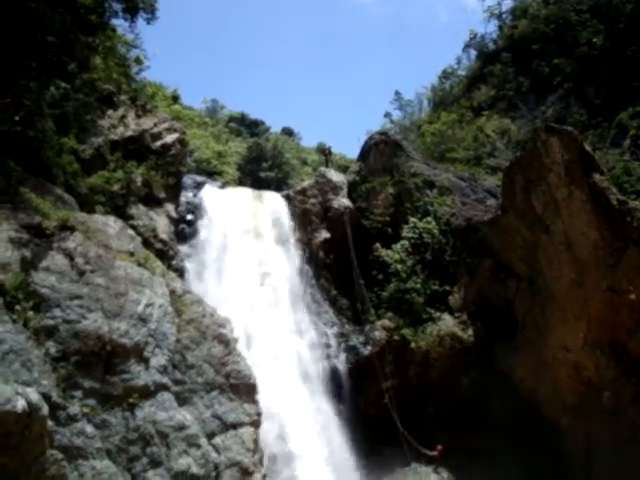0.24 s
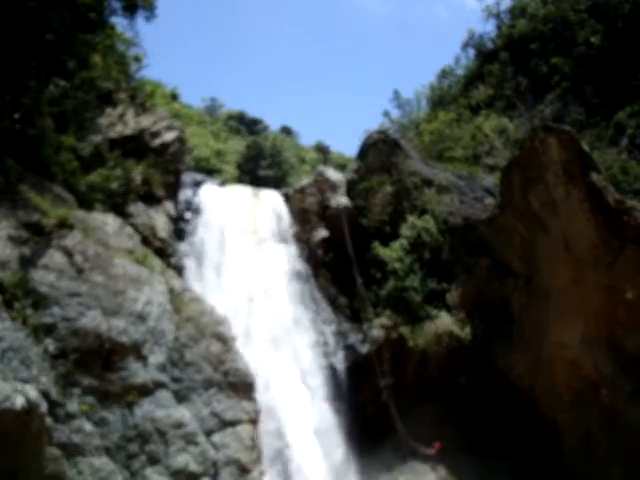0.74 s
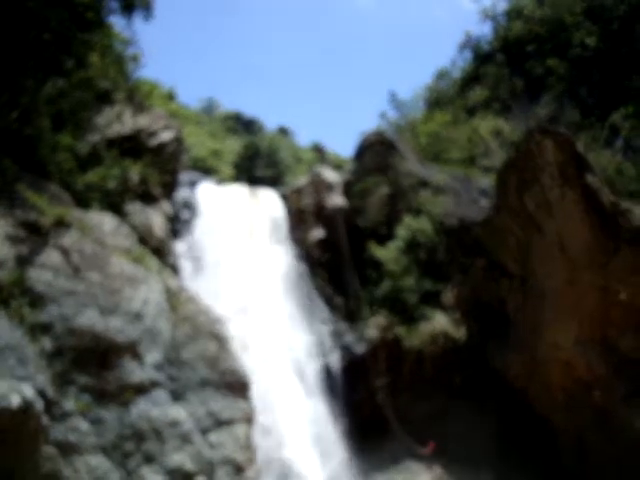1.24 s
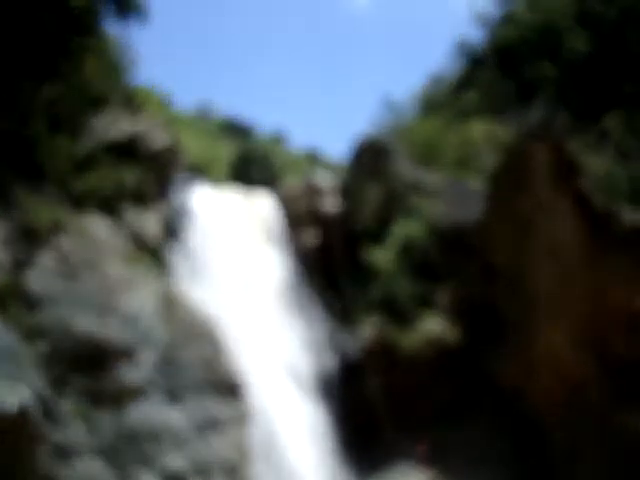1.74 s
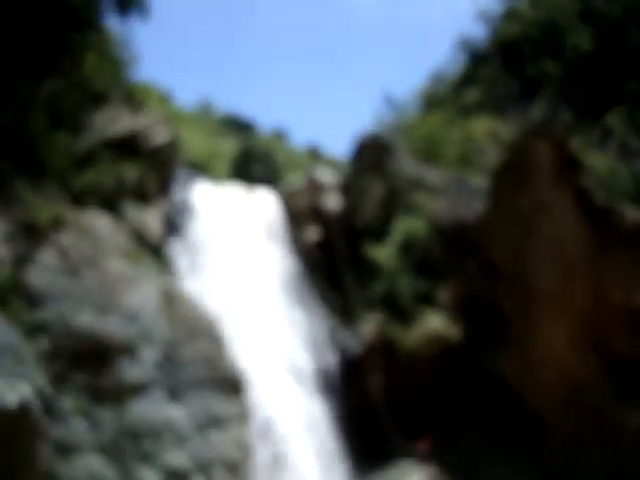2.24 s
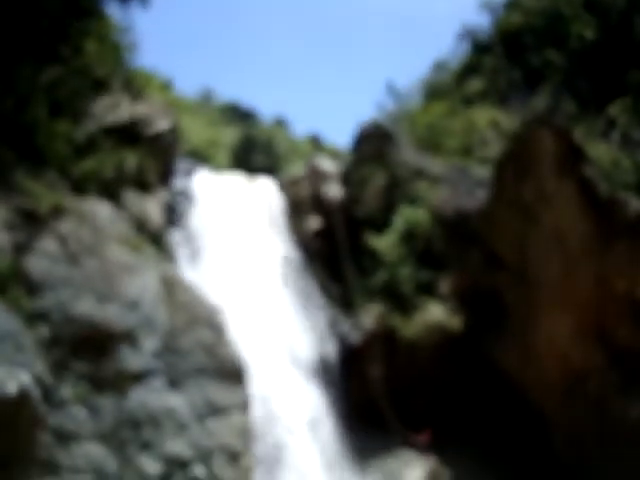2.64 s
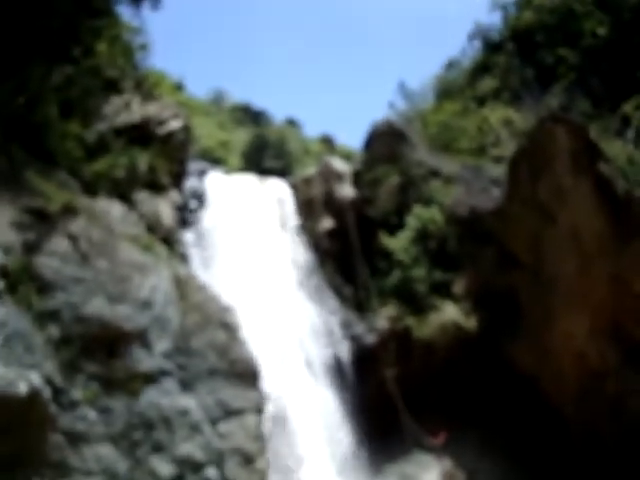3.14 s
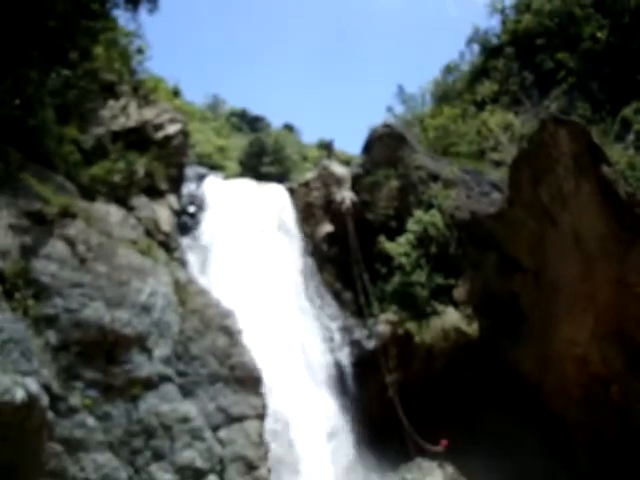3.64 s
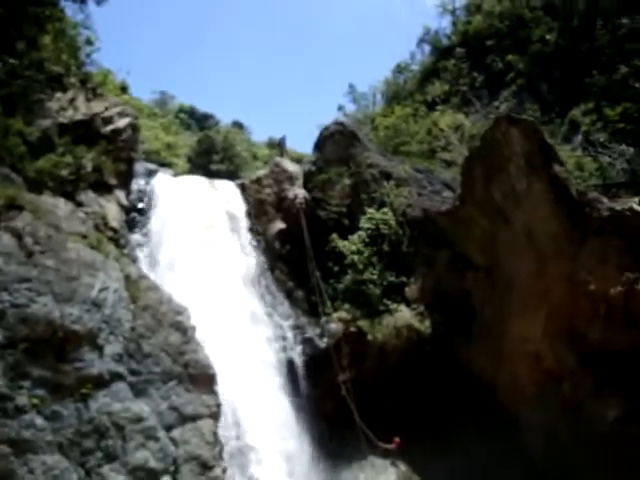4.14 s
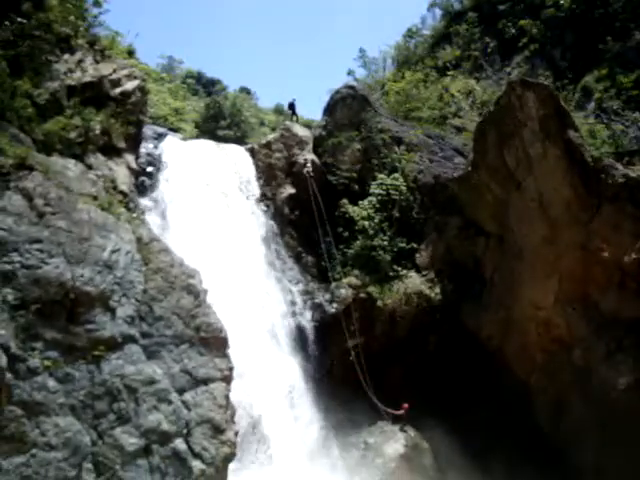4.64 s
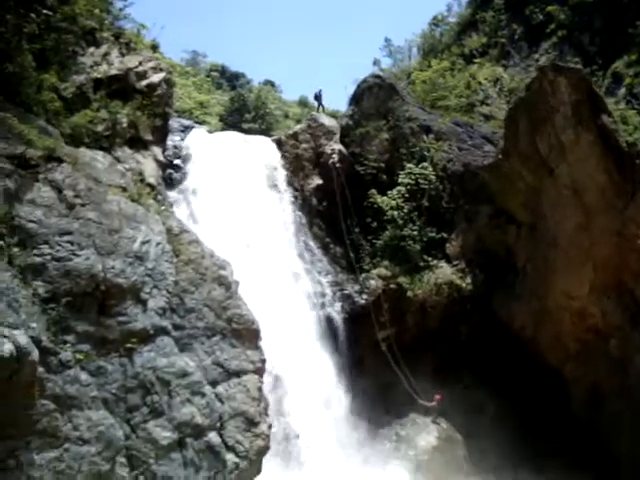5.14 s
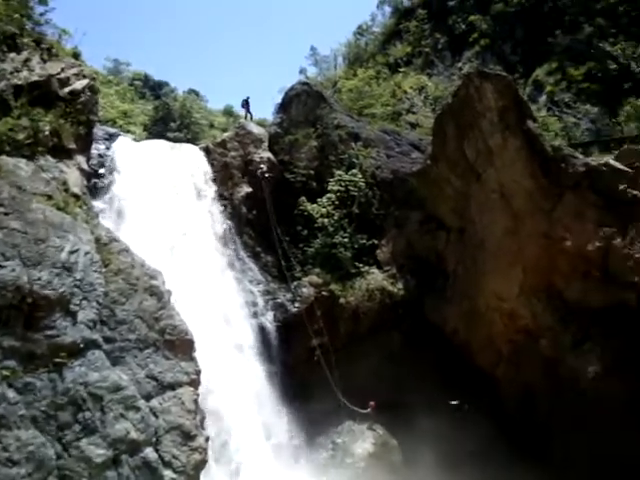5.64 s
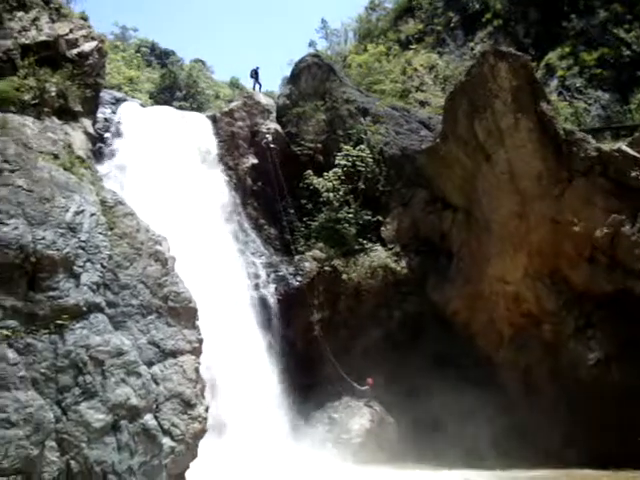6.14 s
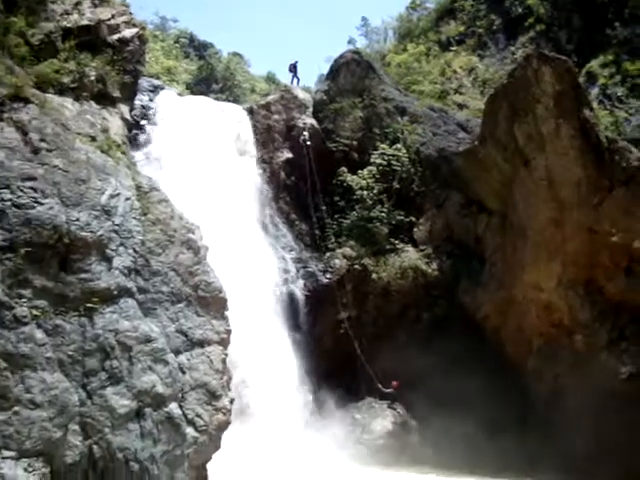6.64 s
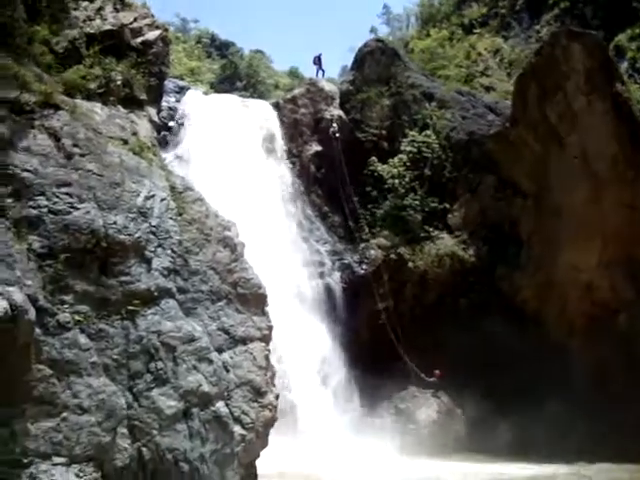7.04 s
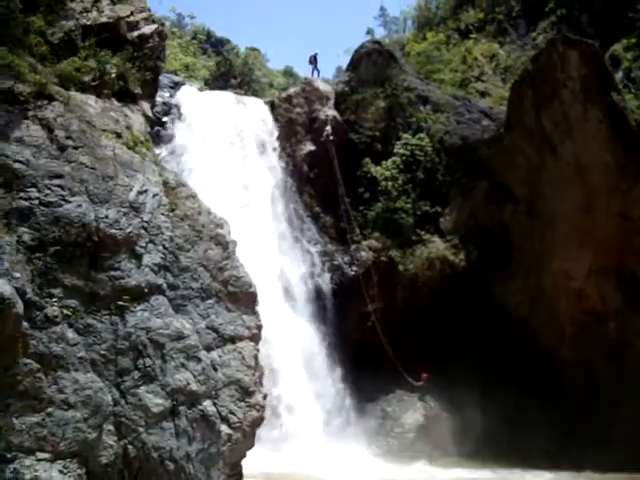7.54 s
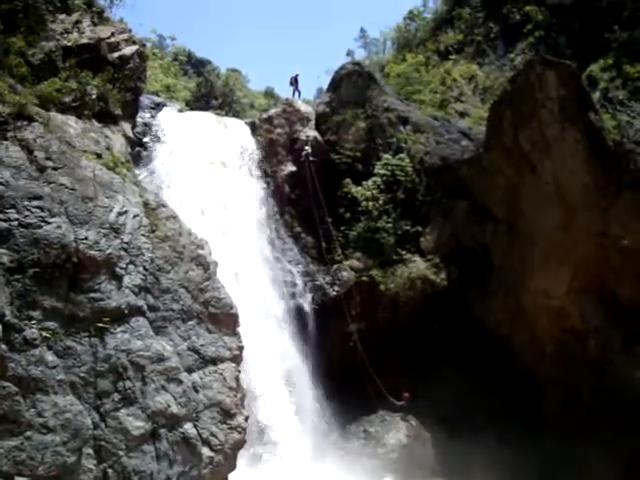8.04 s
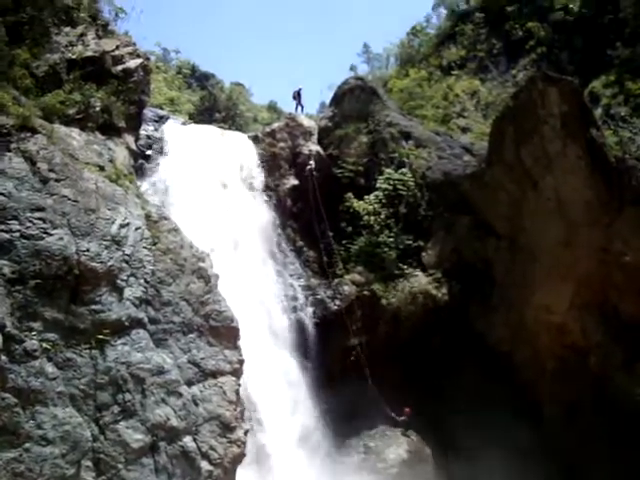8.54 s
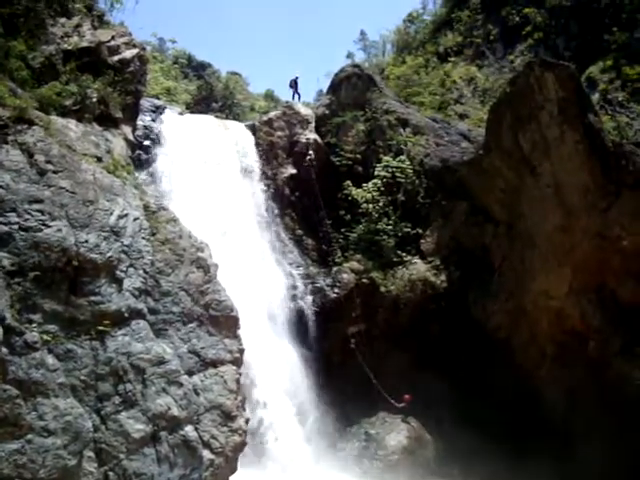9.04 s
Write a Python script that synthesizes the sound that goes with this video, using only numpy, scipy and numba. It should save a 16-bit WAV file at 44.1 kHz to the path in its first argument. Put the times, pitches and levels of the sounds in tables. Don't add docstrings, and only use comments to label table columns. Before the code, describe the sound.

A tall waterfall pours into a rocky pool with a steady, dense, even roar, with one tiny tick early and one faint bird chirp midway.

```python
import sys
import numpy as np
from scipy import signal
from scipy.fft import rfft, irfft
from scipy.io import wavfile
from scipy.ndimage import uniform_filter1d
from numba import njit

SR = 44100
rng = np.random.default_rng(int(sys.argv[2]) if len(sys.argv) > 2 else 0)


def digitize_waveform(pressure):
    field = np.atleast_2d(pressure).T
    bounded = np.clip(field, -1, 1)
    quanta = np.round(bounded * 32767).astype(np.int16)
    wavfile.write(sys.argv[1], SR, quanta)


def ratio(d):
    e = np.asarray(d, float) / 20
    return 10 ** e


N = 409688
T = np.arange(N) / SR
HZ = np.fft.rfftfreq(N, 1 / SR)


def unit(x):
    return x / np.sqrt(np.mean(x ** 2))


def band(spectrum, lo, hi, edge):
    rise = np.clip((HZ - lo) / edge + .5, 0, 1)
    fall = np.clip((hi - HZ) / edge + .5, 0, 1)
    return irfft(spectrum * rise * fall, N)


def walk(rate_hz):
    hold = int(SR / rate_hz)
    held = np.repeat(rng.standard_normal(N // hold + 1), hold)
    smooth = uniform_filter1d(uniform_filter1d(held, hold), hold)
    return unit(smooth[:N])


def breeze():
    gust_s, gust_length_s = 4.9, 1.4
    breeze_db, gust_db, flutter_db = -72, 8, 2.5
    gust = np.exp(-((T - gust_s) / gust_length_s) ** 2)
    level_db = breeze_db + gust * (gust_db + flutter_db * walk(6.0))
    rumble = band(rfft(rng.standard_normal(N)), 22., 70., 20.)
    return ratio(level_db) * unit(rumble)


def bird():
    # centre t/s, length/s, start f/Hz, end f/Hz, peak level/dB
    chirp = (5.503, .034, 6380, 6150, -26)
    centre_s, length_s, from_hz, to_hz, peak_db = chirp
    part = np.clip((T - centre_s) / length_s, -.5, .5)
    pitch_hz = np.interp(part, [-.5, .5], [from_hz, to_hz])
    whistle = np.sin(2 * np.pi * np.cumsum(pitch_hz) / SR)
    return ratio(peak_db) * np.cos(np.pi * part) * whistle


@njit
def grains(count, start, turn, decay, glide, size):
    out = np.zeros(count + 8192)
    for k in range(len(start)):
        swing = size[k] + 0j
        advance = decay[k] * np.exp(1j * turn[k])
        bend = np.exp(1j * turn[k] * glide[k])
        for i in range(8000):
            out[start[k] + i] += swing.imag
            swing, advance = swing * advance, advance * bend
            if abs(swing) < size[k] / 100:
                break
    return out[:count]


def bubbles():
    bubbles_per_s, ring_cycles, glide, spread_db = 5000, 8.0, .15, 1.5
    when, pitch, strength = rng.random((int(bubbles_per_s * N / SR), 3)).T
    hz = 150 * 66 ** pitch
    life = ring_cycles * SR / hz
    size = ratio(-spread_db * np.log(strength)) * hz / 1000
    start = (when * N).astype(np.int64)
    return grains(N, start, 2 * np.pi * hz / SR, np.exp(-2 / life), glide / life, size)


def gorge(x):
    t60_s, tail_db = 1, -6.5
    tail = rng.standard_normal(SR) * ratio(-60 * np.arange(SR) / SR / t60_s)
    path = 1 + ratio(tail_db) * rfft(tail / np.linalg.norm(tail), N)
    return irfft(rfft(x) * path / abs(path), N)


def falling_water():
    # f/Hz, level per Hz/dB
    roar_colour = [(15, -56), (30, -33), (65, -20.5), (150, -6.5), (230, -5), (400, -3), (1000, -1.5),
                   (1080, -2.5), (1600, -4.5), (2000, -5.5), (2450, -3.5), (3400, -4.5), (5600, -9),
                   (10200, -17)]
    # f/Hz, width/Hz, level/dB
    hollows = [
        (272, 98, 2),
        (583, 324, 3),
        (890, 140, 2),
        (1410, 200, 1.4),
    ]
    bubble_db = -8
    cloud = rfft(bubbles())
    cloud = cloud / np.sqrt(uniform_filter1d(abs(cloud) ** 2, size=3000))
    splashes = rng.standard_normal(N)
    water = rfft(gorge(splashes + ratio(bubble_db) * unit(irfft(cloud, N))))
    hz, colour_db = np.transpose(roar_colour)
    tint_db = np.interp(np.log(HZ + 1), np.log(hz), colour_db)
    for f, width, lift_db in hollows:
        tint_db = tint_db + lift_db * np.exp(-(2 * (HZ - f) / width) ** 2)
    water = water * ratio(tint_db)
    return water / np.std(band(water, 300, 2000, 20))


def waterfall():
    # t/s, level/dB
    flow = [(0, -22), (1.2, -23), (2, -22.5), (2.9, -23), (3.5, -22), (4.4, -23), (5.4, -23), (6.8, -23),
            (7.7, -23), (8.7, -22.5), (9.29, -23)]
    surge_db, clump_db, flicker_db = .1, .4, .2
    deep_follows, spray_follows = .1, .3
    body_db = np.interp(T, *np.transpose(flow))
    flow_swing_db = body_db - body_db.mean()
    water = rfft(falling_water()) if N % 2 else rfft(irfft(falling_water(), N))
    surge, clumps = walk(3.2), walk(40)
    out = 0
    for lo in 20 * 2 ** np.arange(0, 9.5, .5):
        deep = np.clip(np.log2(400 / lo), 0, 1)
        spray = np.clip(np.log2(lo / 1200), 0, 1)
        swing_db = (deep * (deep_follows - 1) + spray * (spray_follows - 1)) * flow_swing_db
        chance_db = surge_db * surge + spray * (clump_db * clumps + flicker_db * walk(12.0))
        out = out + ratio(swing_db + chance_db) * band(water, lo, lo * np.sqrt(2), 10)
    return out * ratio(body_db)


def scene():
    return np.tile(waterfall() + breeze() + bird(), (2, 1))


def coarse_treble(x):
    tile_hz, tile_samples, from_hz, top_hz = 500, 36, 5000, 10050
    step_of_peak, leak_db = .69, -18
    spectrum = rfft(x)
    width = int(tile_hz * N / SR) // tile_samples * tile_samples
    for lo in range(from_hz, top_hz - tile_hz // 2, tile_hz):
        k = int(lo * N / SR)
        tiles = irfft(spectrum[k:k + width + 1]).reshape(-1, tile_samples)
        step = step_of_peak * abs(tiles).max(axis=1, keepdims=True)
        coarse = step * np.round(tiles / step) + ratio(leak_db) * tiles
        spectrum[k:k + width + 1] = rfft(coarse.ravel() * tiles.std() / coarse.std())
    top = k + width
    spectrum[top:top + width] = np.conj(spectrum[top:top - width:-1])
    skirt = np.cos(np.pi / 2 * np.clip((HZ - top_hz) / 400 + .5, 0, 1)) ** 3
    return irfft(spectrum * skirt, N)


def splice_tick():
    splice_s, tick_db = .6962, -21.5
    away = np.arange(N) - splice_s * SR
    return ratio(tick_db) * np.sinc(away * 2 * 15800 / SR) * np.exp(-abs(away) / 150)


def noise_fill(mono):
    # t/s, low f/Hz, high f/Hz
    loose_bands = [(0.752, 5100, 6350), (0.752, 8200, 9800), (1.101, 4130, 5250), (1.101, 6900, 8400),
                   (1.356, 7500, 9050), (1.751, 4130, 5250), (2.796, 6850, 9800), (2.982, 4550, 5800),
                   (3.028, 4130, 5250), (3.144, 5600, 7650), (3.423, 5100, 6950), (3.934, 7500, 9050),
                   (4.119, 4130, 5250), (4.839, 8200, 9800), (5.095, 7500, 9800), (6.65, 5600, 6950),
                   (6.743, 4130, 5250), (7.951, 5100, 6350), (8.229, 8200, 9800), (8.601, 8200, 9800),
                   (8.647, 5100, 6950), (8.926, 7500, 9050), (8.926, 5100, 6950), (9.274, 8200, 9800)]
    patch_samples = 2048
    spectrum, other = rfft(mono), rfft(mono[::-1])
    mid, side = mono, 0
    for s, lo, hi in loose_bands:
        window = np.cos(np.pi * np.clip((T - s) * SR / patch_samples, -.5, .5))
        mid = mid - (1 - np.sqrt(.5)) * window ** 2 * band(spectrum, lo, hi, 20)
        side = side + np.sqrt(.5) * window * band(other, lo, hi, 20)
    return np.array([mid + side, mid - side])


def band_limit(x):
    return signal.sosfilt(signal.butter(12, 16000, fs=SR, output="sos"), x)


def record(dry):
    camera = coarse_treble(dry[0])
    mix = noise_fill(camera + splice_tick())
    return band_limit(mix)


dry = scene()
out = record(dry)
digitize_waveform(out)
```